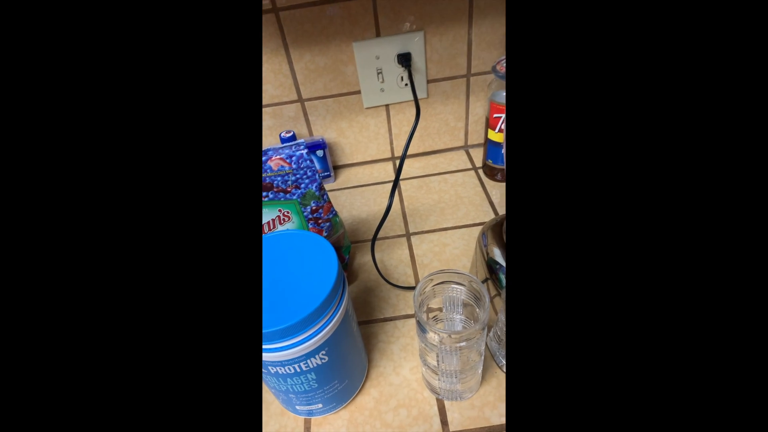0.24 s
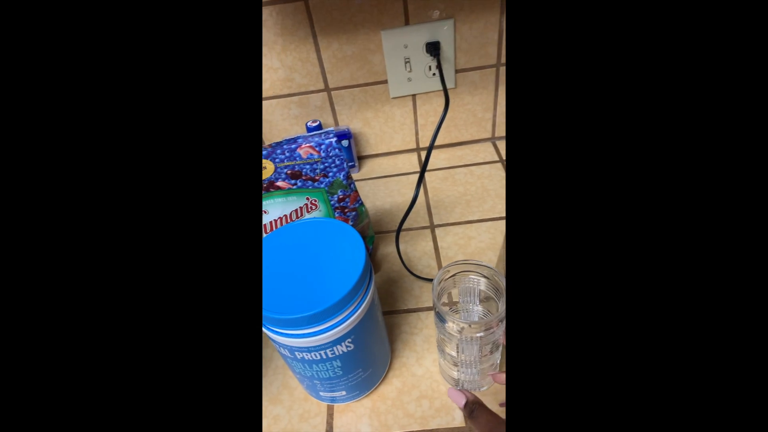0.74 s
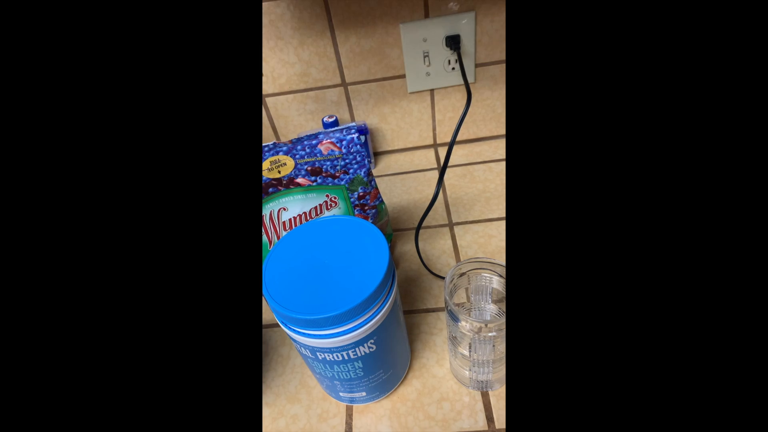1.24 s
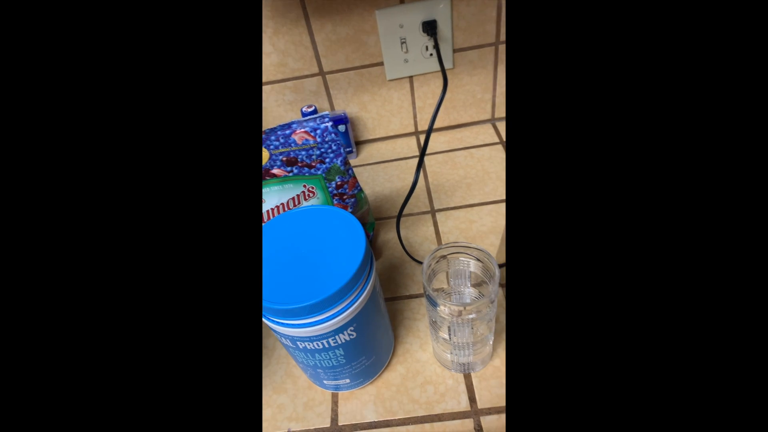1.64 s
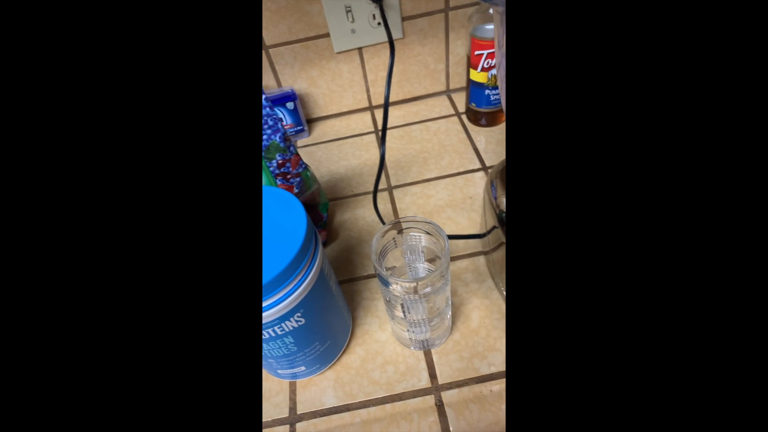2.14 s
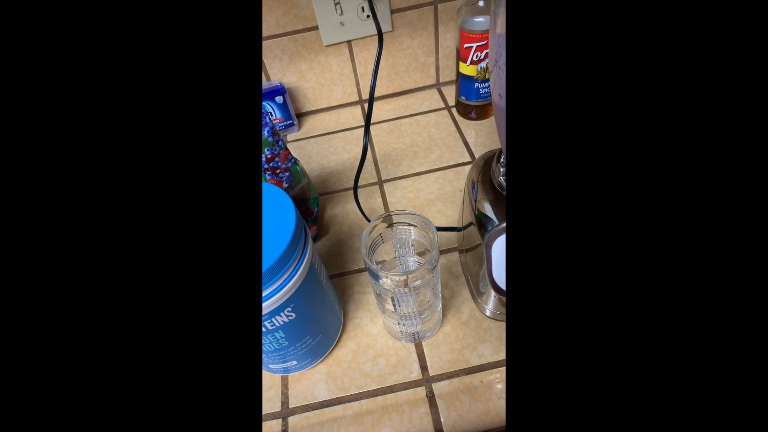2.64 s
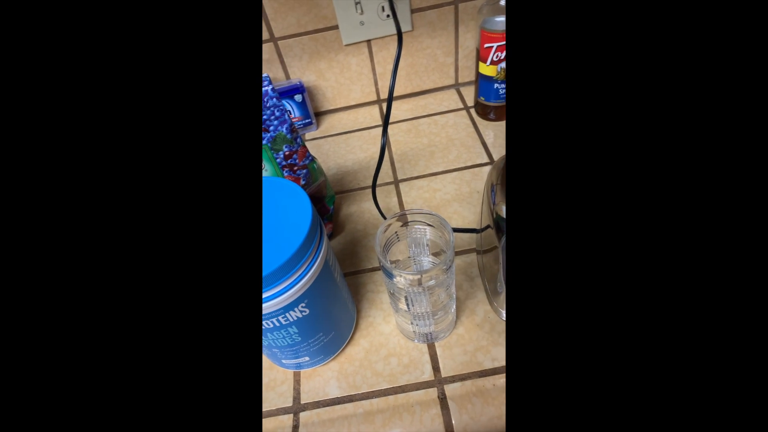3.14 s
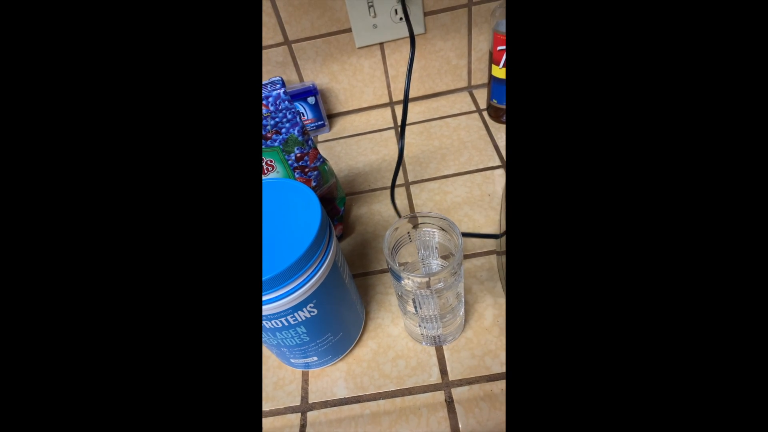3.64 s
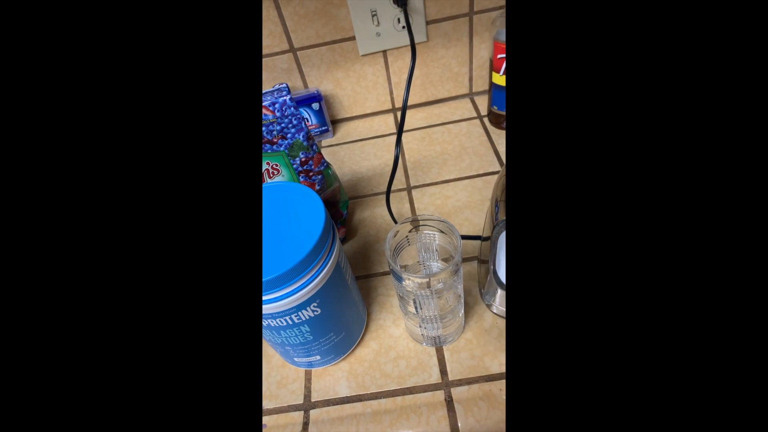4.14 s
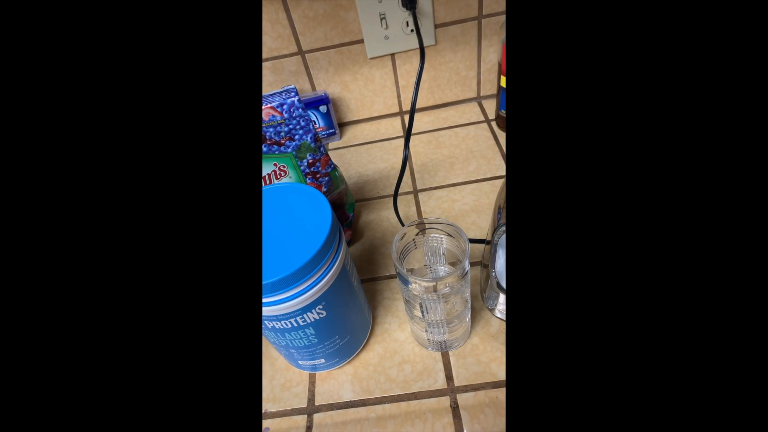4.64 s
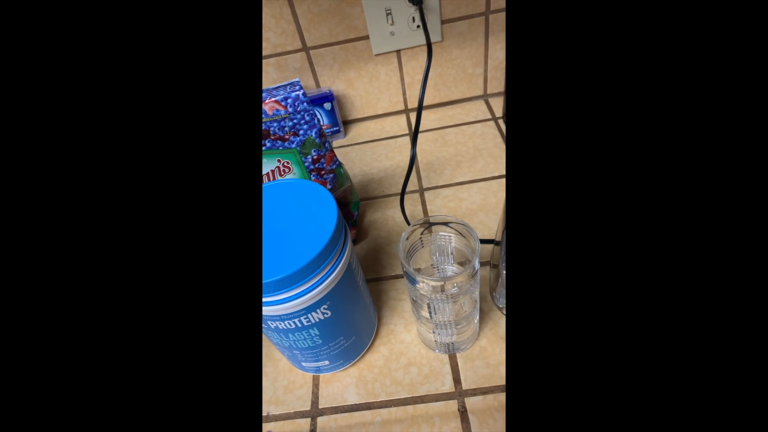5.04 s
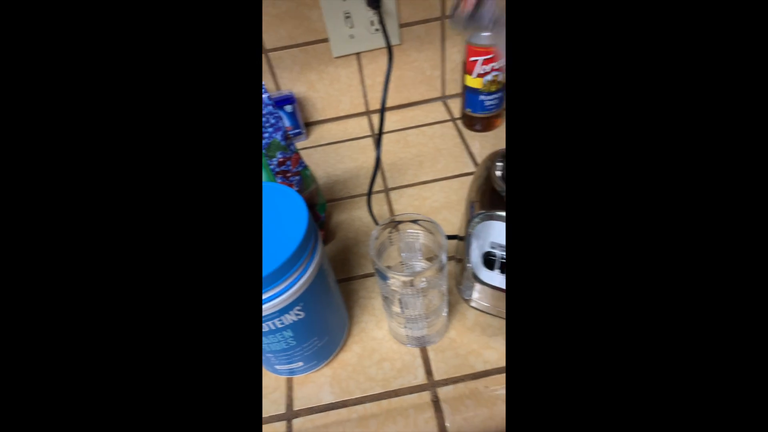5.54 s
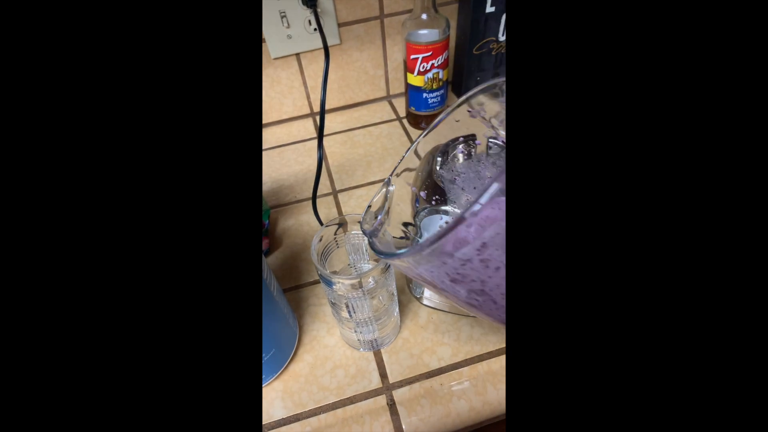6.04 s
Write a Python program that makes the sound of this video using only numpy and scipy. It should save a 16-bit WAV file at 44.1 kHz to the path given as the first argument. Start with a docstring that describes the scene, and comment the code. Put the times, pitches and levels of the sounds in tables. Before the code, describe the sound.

A drinking glass is pushed over a tiled kitchen counter, its foot sticking, slipping and ringing. Small clinks, a dull rub and light taps follow, then a second short slide. Next the jug of a switched-off blender is twisted and lifted: plastic scrapes, clicks and knocks while the base thumps on its rubber feet. A hand-held stereo microphone hears it close by in a hard, quiet room.

```python
"""A ribbed drinking glass is pushed over a tiled kitchen counter: its foot sticks, slips and rings.
Small clinks, a dull rub and light taps follow, then a second stuttering slide at 1.8 s.
From 2.5 s the jug of a switched-off blender is twisted and lifted from its base: plastic lugs
scrape, click and knock, and the base thumps on its rubber feet.
A hand-held stereo microphone hears it all close by, in a hard, quiet room."""
import sys
import numpy as np
from scipy import signal
from scipy.fft import rfft, irfft, next_fast_len
from scipy.io import wavfile

SR = 44100
rng = np.random.default_rng(int(sys.argv[2]) if len(sys.argv) > 2 else 0)


def inscribe(sig):
    """Save sig as 16-bit PCM at rate SR to the path in sys.argv[1].

    A 1-D sig is mono; a 2-D sig holds one channel per row.
    Samples are clipped to [-1, 1] before scaling.
    """
    pcm = np.round(np.clip(np.atleast_2d(sig).T, -1, 1) * 32767)
    wavfile.write(sys.argv[1], SR, pcm.astype(np.int16))


N = 277389
TIME_S = np.arange(N) / SR
RING_TIME_S = TIME_S[:SR // 2]
LN_1000 = np.log(1000)  # 60 dB of decay

# Room decay. Each row: frequency in Hz, t60 in seconds.
ROOM_T60 = [(100, 1), (400, 0.4), (1300, 0.44), (3000, 0.39), (8000, 0.4), (15000, 0.38)]
# Likeness of diffuse sound at the two microphone ports. Each row: frequency in Hz, coherence from 0 to 1.
COHERENCE = [(60, 0.6), (150, .9), (350, 0.7), (700, 0.6), (1400, 0.2), (3000, 0.5), (7000, 0.6),
             (12000, 0.5), (16000, 0.6)]
# Port phase for the jug's and the glass's direction. Each row: frequency in Hz, left lead in radians.
JUG_PHASE = [(0, 0), (860, -3.6), (1120, -3.7), (1810, -6.2), (2330, -9.1), (2580, -9.1), (3960, -10.8),
             (5860, -8.7), (6630, -7.0), (8790, -6.1), (11300, -3.5), (13000, -2.8), (15200, -0.2),
             (16400, 0.2)]
GLASS_PHASE = [(0, 0), (430, -0.8), (1120, -5.9), (1810, -6.2), (2500, -8.7), (3880, -10.7), (5600, -8.9),
               (6200, -7.6), (7920, -6.3), (9040, -6.2), (11000, -3.6), (13700, -2.3), (15200, 0.0),
               (16400, 0.2)]

# Spectra. Each row: frequency in Hz, relative level in dB.
ROOM_SPECTRUM = [(20, -4.5), (70, -5), (150, -8.5), (290, -7), (400, -9.5), (520, -23.5), (750, -17.5),
                 (1100, -33.5), (2000, -32.5), (3500, -41.5), (5000, -47), (7200, -41), (11000, -49),
                 (16000, -53)]
RUB_SPECTRUM = [(100, -21), (230, -9), (320, -8.5), (400, 0.5), (490, -14.5), (620, -8.5), (830, -6.5),
                (1050, -16.5), (2400, -34.5), (4000, -48), (12000, -50)]
SNAP_SPECTRUM = [(300, -17.5), (850, -3), (1200, 7), (2500, -1), (4000, -1), (5300, -5), (8200, -0.5),
                 (11000, -6.5), (14000, -7.5), (16000, -20)]  # hard contacts
SCRAPE_SPECTRUM = [(150, -5.5), (400, 0), (580, 2.5), (830, 0.5), (1250, 9.5), (1750, 2), (2800, -5.5),
                   (4000, -7), (5300, -11), (8000, -18), (14000, -58)]  # plastic on plastic
GRIT_SPECTRUM = [(100, -22), (230, -14), (350, -24.5), (520, -29.5), (760, -18), (1030, -10.5), (1200, 5.5),
                 (1400, 2.5), (1700, -7), (2100, -1), (2700, -20), (4100, -25), (5300, -35), (15000, -50.5)]  # grit under the glass
RUMBLE_SPECTRUM = [(15, -18.5), (30, -7.5), (62, -0.5), (100, -18), (200, -23), (600, -62.5), (3000, -98)]
THUMP_SPECTRUM = [(20, -29.5), (42, -9.5), (62, 1.5), (100, 3), (200, -27.5), (600, -45.5)]

# Modes. Each row: frequency in Hz, relative level in dB, t60 in seconds.
RUBBER_FEET_MODES = [(52.94, -4, 0.34), (64, -4.5, 0.38), (79, -12.5, 0.092), (117.8, -5, 0.22)]
BASE_MODES = [(245, -5.5, 0.02), (392.4, 1, 0.14), (402, 2.5, 0.075), (570, 1, 0.11), (680, 1.5, 0.059)]
JUG_MODES = [(1150, 0.5, 0.04), (1414, -8.5, 0.013), (1407, 2.5, 0.1), (1630, 14, 0.019), (1903, 3, 0.029),
             (2315, 9, 0.069)]
CLINK_MODES = [(5700, -5, .03), (6250, 2.5, 0.13), (6520, 4, 0.0289), (6498, -2.5, 0.19),
               (9566, -5.5, 0.25), (9450, -6, 0.026), (10230, -9.5, 0.18), (14060, -13, 0.1)]
TILE_MODES = [(890, 2.5, 0.034), (1069, -4.5, 0.019)]
GLASS_WALL_MODES = [(1140, 2, 0.15), (2825, 1, 0.14), (2895, -4, 0.044), (3740, -13, 0.13),
                    (4770, -15, 0.34), (5500, -24, 0.3), (6270, 7, 0.033), (8700, -8, 0.19)]
GLASS_FOOT_MODES = [(1179, -1.5, .28), (1200, -6.5, 0.24), (1290, -6.5, 0.31), (1331, 8, .009),
                    (1385, -3.5, 0.18), (1493, -1, .05), (1873, 0, .08), (2098, -4.5, 0.12),
                    (2135, -7, .16), (2300, -10, .09)]

# Strikes. Each row: start in seconds, relative level in dB.
THUMPS = [(1.401, -40.5), (2.484, -36.5), (2.904, -31), (3.008, -25), (3.107, -28.5), (3.44, -25),
          (3.825, -28), (3.952, -30.5), (4.199, -29), (4.287, -36.5), (4.657, -29), (5.05, -42)]  # the base rocks
CLINKS = [(.431, -37.5), (.438, -51), (.463, -44), (.503, -50.5), (.553, -65), (.80, -75.5), (.935, -79),
          (.967, -69)]  # something small and hard
WALL_TAPS = [(1.391, -56.5), (1.400, -47), (1.409, -51.5), (1.418, -49), (1.423, -54)]  # on the glass
# Dull bumps on the counter. Each row: start in seconds, level in dB, pitch in Hz.
BUMPS = [(0.078, -40.5, 396), (.462, -41, 526), (1.633, -51, 360), (1.795, -52.5, 399), (4.691, -44, 341),
         (4.931, -57.5, 369), (5.048, -48, 345)]
# Envelope of the rub. Each row: time in seconds, relative level in dB.
RUB_ENVELOPE = [(0.74, -73), (0.83, -55), (0.854, -61.5), (0.904, -58), (0.92, -71), (0.976, -88),
                (0.98, -69)]
# Hand strokes. Each row: start in seconds, length in seconds, effort in dB, drift in dB per second.
JUG_TWISTS = [(2.872, .25, -62, -5), (3.195, .05, -65, 2.5), (3.3, .14, -64, 3), (3.61, 0.063, -59, -20),
              (3.945, 0.36, -57, -0.5), (4.61, 0.0966, -58.5, -3), (4.99, .11, -67.5, 9)]
GLASS_PUSHES = [(0.0, 0.11, -53.5, -19.5), (0.119, 0.14, -33, -26.5), (0.306, 0.14, -35.5, -92.5),
                (1.806, .08, -43, -79), (1.906, 0.077, -38, -21)]
# The jug's lugs catch and let go. Each row: start in seconds, force in dB, snap over force in dB.
LUG_CATCHES = [(2.4864, -61.5, -23), (2.9011, -47.5, -11), (2.9739, -48, -7), (3.0057, -39.5, 3),
               (3.1047, -42.5, -10), (3.2277, -55, -19), (3.3334, -52.5, -14), (3.4013, -49.5, -3),
               (3.4411, -36, 12.5), (3.8187, -42, -3), (3.8256, -35.5, 13.5), (3.8304, -30, 2),
               (3.945, -49.5, 16.5), (3.9553, -34, 4.5), (3.9808, -35, 4.5), (4.0314, -37, 2),
               (4.058, -45.5, 10), (4.1415, -39, -9), (4.188, -40.5, 1.5), (4.2085, -42.5, -15),
               (4.245, -42.5, -27), (4.288, -47, 8), (4.406, -58.5, -21), (4.5465, -48, -7.5),
               (4.6418, -45, 0.5), (4.871, -70, -17), (4.93, -69, -22.5), (5.0186, -50.5, -20),
               (5.0502, -56, -9.5)]
# Hardest slips of the glass. Each row: start in seconds, relative level in dB, factor on crunch pitch.
HARD_SLIPS = [(.1185, -9, 1.0), (.1512, -12, 1.0), (.1735, -10.5, 1.0), (.2268, -21, 1.11),
              (.3058, -14, 1.03), (.3183, -13, 1.042), (.3298, -18, 1.02), (.4765, -31, 0.88),
              (1.8043, -25, 0.95), (1.8705, -46, 1.17), (1.9016, -21.5, 0.99), (1.917, -23, 0.83),
              (1.9285, -19.5, 1.04), (1.946, -20.5, 1.09), (1.9588, -29.5, 0.61)]
# How the glass sits in each slide. Each row: factor on ring pitch, then glass ring, rub, tile ring in dB.
GLASS_GRIPS = [(1.0, -35, -23.5, -50.5), (1.056, -31.5, -12.5, -26.5)]

TWIST_ATTACK_S, TWIST_RELEASE_S, RATTLES_PER_S, RATTLE_SNAP_DB = 0.013, 0.07, 35, -5.5
CATCH_T60_S, KNOCK_DB, SKID_DB, SKID_T60_S = 0.02, -3, -4, 0.15
PUSH_ATTACK_S, PUSH_RELEASE_S, SLIPS_PER_S, SECOND_GRIP_FROM_S = 0.02, 0.06, 60, 1.0
BAND_LIMIT_HZ = 16100


def amp(db):
    """Decibels to gain."""
    return 10 ** (np.asarray(db) / 20)


def unit_rms(x):
    """Scales to rms 1."""
    return x / np.sqrt(np.mean(x ** 2) + 1e-20)


def at_hz(table, hz):
    """Interpolates a table over log frequency."""
    table_hz, value = np.transpose(table)
    return np.interp(np.log(hz + 1), np.log(table_hz + 1), value)


def add(mix, start_s, sound):
    """Mixes a sound in at start_s."""
    part = mix[max(round(start_s * SR), 0):][:len(sound)]
    part += sound[:len(part)]


def colour(x, spectrum, size=4096):
    """Minimum-phase filter of unit energy."""
    hz = abs(np.fft.fftfreq(size, 1 / SR))
    log_gain = np.log(amp(np.maximum(at_hz(spectrum, hz), -100)))
    taps = np.fft.ifft(np.exp(np.conj(signal.hilbert(log_gain)))).real[:size // 2]
    return signal.oaconvolve(x, taps / np.linalg.norm(taps))[:len(x)]


def ring(force, modes):
    """Drives damped modes; a unit click peaks at 1."""
    t = RING_TIME_S
    body = sum(amp(db) * np.exp(-LN_1000 * t / t60_s) * np.sin(2 * np.pi * hz * t)
               for hz, db, t60_s in modes)
    return signal.oaconvolve(force, body / abs(body).max())[:len(force)]


def grains(per_s):
    """Friction as sparse random impulses, rms 1."""
    return unit_rms(rng.standard_normal(N) * (rng.random(N) < per_s / SR))


def strikes(rows):
    """One impulse a row."""
    force = np.zeros(N)
    for start_s, db, *_ in rows:
        add(force, start_s, amp([db]))
    return force


def scuff(t60_s, rise_s, size=4096):
    """One contact of unit energy: a spray of tiny impacts that swells and dies."""
    t = TIME_S[1:size + 1]
    spray = rng.standard_normal(size) * np.exp(0.5 * rng.standard_normal(size))
    spray *= np.exp(-LN_1000 * t / t60_s) * (1 - np.exp(-t / rise_s))
    return spray / np.linalg.norm(spray)


def scratches(rows, t60_s, rise_s):
    """One impulse and one scuff a row."""
    force = 0.5 * strikes(rows)
    for start_s, db in rows:
        add(force, start_s, 0.83 * amp(db) * scuff(t60_s, rise_s))
    return force


def effort(strokes, attack_s, release_s):
    """Gain of hand strokes: each swells, drifts steadily and dies away."""
    gain = np.zeros(N)
    for start_s, length_s, db, db_per_s in strokes:
        t = TIME_S - start_s
        attack = np.clip(1 + t / attack_s, 0, 1)
        release = np.exp(-LN_1000 * np.clip((t - length_s) / release_s, 0, 2))
        gain += attack * amp(db + db_per_s * np.clip(t, 0, length_s)) * release
    return gain


def stutter(strokes, per_s, offset_db, spread_db, count=24):
    """Stick-slip: contacts (s, dB) at uneven gaps, following the stroke's effort."""
    rows = []
    for start_s, length_s, db, db_per_s in strokes:
        times_s = np.cumsum(0.5 + rng.random(count)) / per_s
        levels_db = db + offset_db + db_per_s * times_s + spread_db * rng.standard_normal(count)
        rows += [(start_s + t, level_db) for t, level_db in zip(times_s, levels_db) if t < length_s]
    return rows


def ports(phase, sound, other=None):
    """Stereo by phase shift; blending in another signal makes the right port partly unlike the left."""
    size = next_fast_len(len(sound) + 4096)
    hz, left = np.fft.rfftfreq(size, 1 / SR), rfft(sound, size)
    same = np.clip(at_hz(COHERENCE, hz), 0, 1)
    right = left if other is None else same * left + np.sqrt(1 - same ** 2) * rfft(other, size)
    lead_rad = np.interp(hz, *np.transpose(phase)) * (1 - np.exp(-(hz / 200) ** 2))  # bass unshifted
    turn = np.exp(0.5j * lead_rad)
    return irfft([left * turn, right / turn], size)[:, :len(sound)]


def kitchen(x, phase, tiles_db, room_db, tiles_t60_s):
    """Direct sound, early reflections off the tiles, and the room's tail."""
    t = TIME_S[:SR * 3 // 4]
    early, late = rng.choice([-1., 1.], (2, 2, len(t))) * (rng.random((2, 2, len(t))) < 5000 / SR)
    early *= np.exp(-LN_1000 * t / tiles_t60_s) * (t > 0.002)
    hz, frame_s, bands = signal.stft(late * (1 - np.exp(-t / 0.0047)), SR, nperseg=256)
    bands *= np.exp(-LN_1000 * frame_s / at_hz(ROOM_T60, hz)[:, None])
    late = signal.istft(bands, SR, nperseg=256)[1][:, :len(t)]
    echoes = amp(tiles_db) * early / np.linalg.norm(early[0])
    echoes += amp(room_db) * late / np.linalg.norm(late[0])
    return ports(phase, x) + signal.fftconvolve(x[None], ports(phase, *echoes), axes=1)[:, :N]


def background(air_db=-66.5, rest_rumble_db=-68):
    """Steady room noise, and handling rumble that grows while the jug is twisted."""
    air = [unit_rms(colour(noise, ROOM_SPECTRUM)) for noise in rng.standard_normal((2, N))]
    rumble = unit_rms(colour(rng.standard_normal(N), RUMBLE_SPECTRUM))
    handling = amp(rest_rumble_db) + amp(-6) * effort(JUG_TWISTS, TWIST_ATTACK_S, TWIST_RELEASE_S)
    return amp(air_db) * ports(JUG_PHASE, *air) + handling * rumble


def counter_rub():
    """Soft, dull friction along the counter."""
    envelope_db = np.interp(TIME_S, *np.transpose(RUB_ENVELOPE), left=-150, right=-150)
    sound = amp(1.5) * colour(grains(per_s=900) * amp(envelope_db), RUB_SPECTRUM)
    return kitchen(sound, GLASS_PHASE, tiles_db=1.5, room_db=-10, tiles_t60_s=0.062)


def counter_bumps(swell_s=0.0014):
    """Soft contacts, each ringing one low note of the counter."""
    envelope = RING_TIME_S / swell_s * np.exp(1 - RING_TIME_S / swell_s)
    sound = np.zeros(N)
    for start_s, db, hz in BUMPS:
        add(sound, start_s, amp(db) * envelope * np.sin(2 * np.pi * hz * RING_TIME_S))
    return kitchen(sound, GLASS_PHASE, tiles_db=-1.5, room_db=-1.5, tiles_t60_s=0.055)


def clinks():
    """Hard contacts tick, then ring a small object or the glass's wall."""
    small = scratches(CLINKS, t60_s=0.015, rise_s=0.0012)
    wall = scratches(WALL_TAPS, t60_s=0.029, rise_s=0.0015)
    ticks = colour(amp(3.5) * small + amp(16) * wall, SNAP_SPECTRUM)
    sound = amp(7) * ring(small, CLINK_MODES) + amp(-2.5) * ring(wall, GLASS_WALL_MODES) + ticks
    return kitchen(sound, JUG_PHASE, tiles_db=0, room_db=-11.5, tiles_t60_s=0.01)


def base_thumps():
    """The heavy base rocks on its rubber feet and shakes the counter."""
    force = colour(strikes(THUMPS), THUMP_SPECTRUM)
    return ports(JUG_PHASE, amp(-32.5) * ring(force, RUBBER_FEET_MODES))


def jug_catches(rows):
    """Catches at one spot of the rim: each snaps, rings the jug and knocks the base."""
    snaps, blows = np.zeros((2, N))
    for start_s, force_db, hardness_db in rows:
        snap_db = force_db + hardness_db
        snap = scuff(CATCH_T60_S, rise_s=0.0001 * amp(-0.8 * (snap_db + 35)))  # harder lets go faster
        blow = 0.94 * scuff(1.6 * CATCH_T60_S, rise_s=0.0019)  # heavy parts answer more slowly
        blow[0] += 0.5
        add(snaps, start_s, amp(snap_db) * snap)
        add(blows, start_s, amp(force_db) * blow)
    detune = np.array([rng.uniform(1.0, 1.03), 1, 1])  # grip and filling shift the modes
    body = ring(blows, JUG_MODES * detune) + amp(KNOCK_DB) * ring(blows, BASE_MODES * detune)
    contact = amp(17.5) * colour(snaps, SNAP_SPECTRUM) + amp(14.5) * colour(blows, SCRAPE_SPECTRUM)
    return kitchen(contact + amp(4.5) * body, JUG_PHASE, tiles_db=-4, room_db=-11.5, tiles_t60_s=0.075)


def blender_jug(spots=4):
    """The jug grates and rattles on its seat, catches at several spots in turn and skids on."""
    skids = signal.lfilter([1], [1, -np.exp(-LN_1000 / SKID_T60_S / SR)], strikes(LUG_CATCHES))
    rubbing = effort(JUG_TWISTS, TWIST_ATTACK_S, TWIST_RELEASE_S) + amp(SKID_DB) * skids
    scrape = amp(-7.5) * colour(grains(per_s=700) * rubbing, SCRAPE_SPECTRUM)
    scrape = kitchen(scrape, JUG_PHASE, tiles_db=1.5, room_db=-3, tiles_t60_s=0.031)
    rattles = stutter(JUG_TWISTS, RATTLES_PER_S, offset_db=2, spread_db=1)
    rows = LUG_CATCHES + [(start_s, db, RATTLE_SNAP_DB) for start_s, db in rattles]
    return scrape + sum(jug_catches(rows[spot::spots]) for spot in range(spots))


def grip_at(time_s):
    """How the glass sits at time_s."""
    return GLASS_GRIPS[int(time_s > SECOND_GRIP_FROM_S)]


def glass_foot(force, crunch_pitch, grip):
    """Grit crunches under the foot and rings the glass and the tile."""
    ring_pitch, ring_db, _, tile_db = grip
    crunch = colour(force, np.multiply(GRIT_SPECTRUM, [crunch_pitch, 1]))
    glass = ring(crunch, np.multiply(GLASS_FOOT_MODES, [ring_pitch, 1, 1]))
    return crunch + amp(ring_db) * glass + amp(tile_db) * ring(crunch, TILE_MODES)


def glass_slips(rows):
    """Each slip is a brief chatter; a tighter catch crunches higher."""
    sound = np.zeros(N)
    for start_s, db, crunch_pitch in rows:
        force = scuff(t60_s=0.0051, rise_s=0.0013, size=10000)
        chatter = glass_foot(force, crunch_pitch, grip_at(start_s))
        add(sound, start_s, amp(db + 10) * chatter / np.linalg.norm(chatter))
    return kitchen(sound, GLASS_PHASE, tiles_db=-4.5, room_db=-5, tiles_t60_s=0.097)


def sliding_glass(spots=3):
    """The foot grinds over fine grit, sticks and slips; reflections change from spot to spot."""
    grit = grains(per_s=400)
    grind = np.zeros(N)
    for grip in GLASS_GRIPS:
        pushes = [row for row in GLASS_PUSHES if grip_at(row[0]) == grip]
        foot = unit_rms(glass_foot(grit, crunch_pitch=0.96, grip=grip))
        rub = amp(grip[2]) * colour(grit, RUB_SPECTRUM)
        grind += effort(pushes, PUSH_ATTACK_S, PUSH_RELEASE_S) * (foot + rub)
    grind = kitchen(amp(-6) * grind, GLASS_PHASE, tiles_db=1.5, room_db=-10, tiles_t60_s=0.078)
    small_slips = stutter(GLASS_PUSHES, SLIPS_PER_S, offset_db=9.5, spread_db=2.5)
    rows = HARD_SLIPS + [(start_s, db, rng.uniform(0.99, 1.03)) for start_s, db in small_slips]
    slips = sum(glass_slips(rows[spot::spots]) for spot in range(spots))
    return amp([[-0.2], [0.2]]) * (grind + slips)  # slightly right


def scene():
    """Stereo sum of all sources."""
    counter = sliding_glass() + counter_rub() + clinks() + counter_bumps()
    return counter + blender_jug() + base_thumps() + background()


def record(dry):
    """The recorder's band limit."""
    lowpass = signal.firwin(255, BAND_LIMIT_HZ, window=("kaiser", 9), fs=SR)
    return signal.oaconvolve(dry, lowpass[None], "same")


dry = scene()
out = record(dry)
inscribe(out)
```